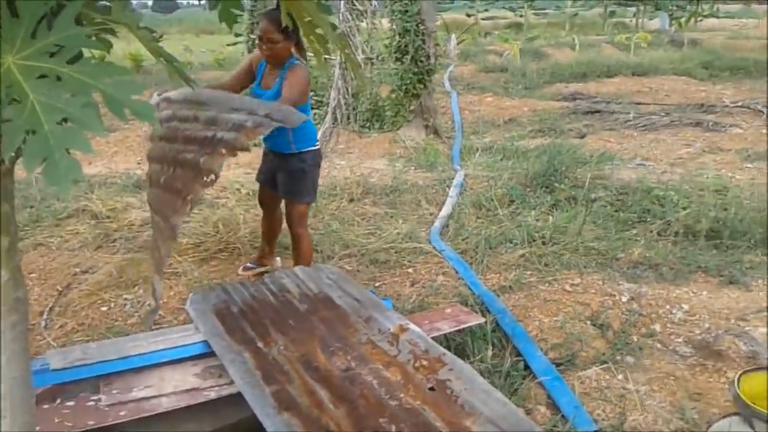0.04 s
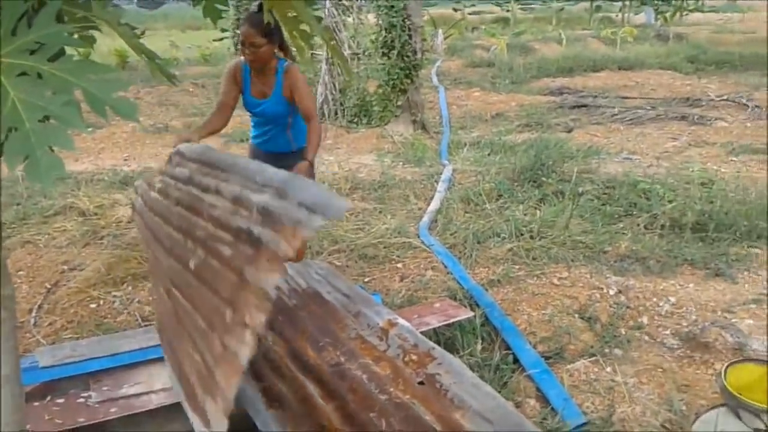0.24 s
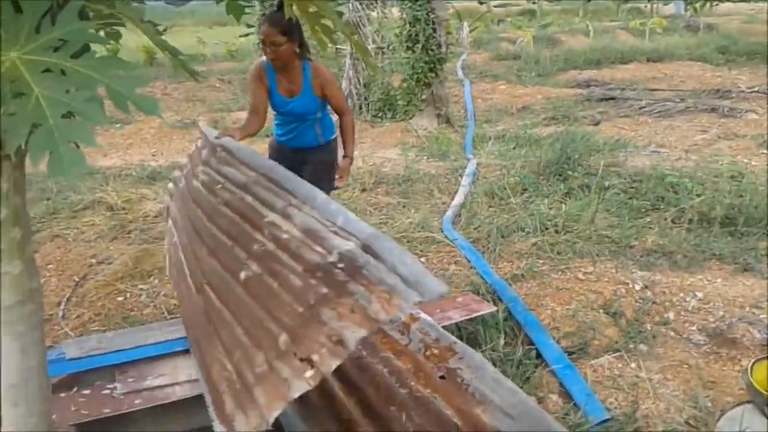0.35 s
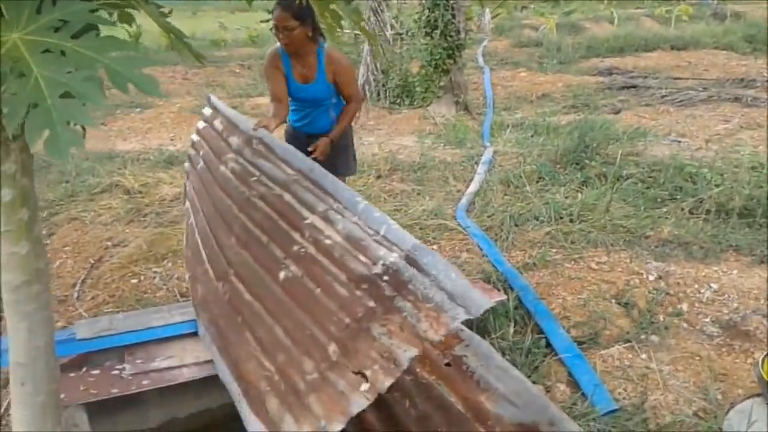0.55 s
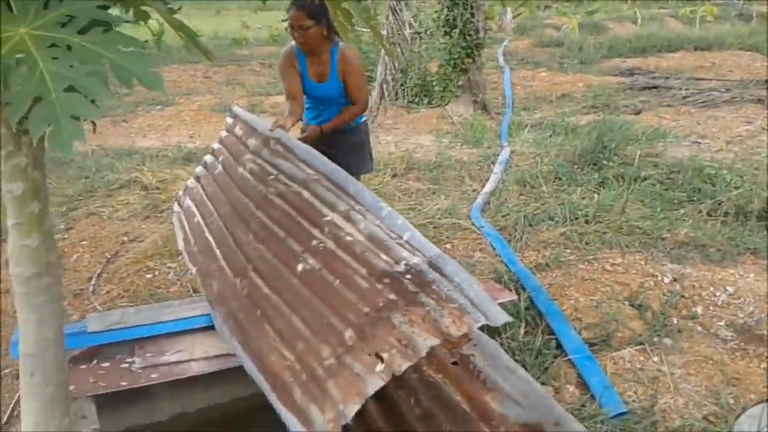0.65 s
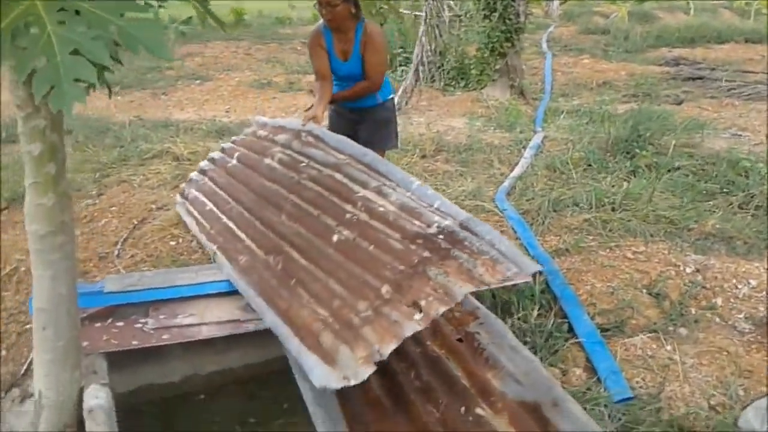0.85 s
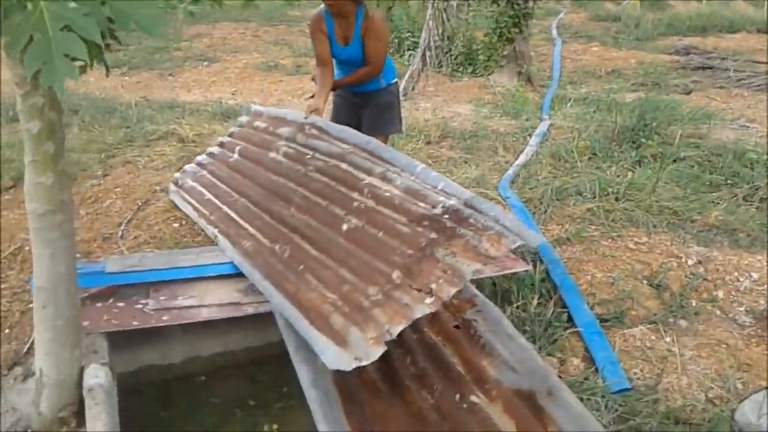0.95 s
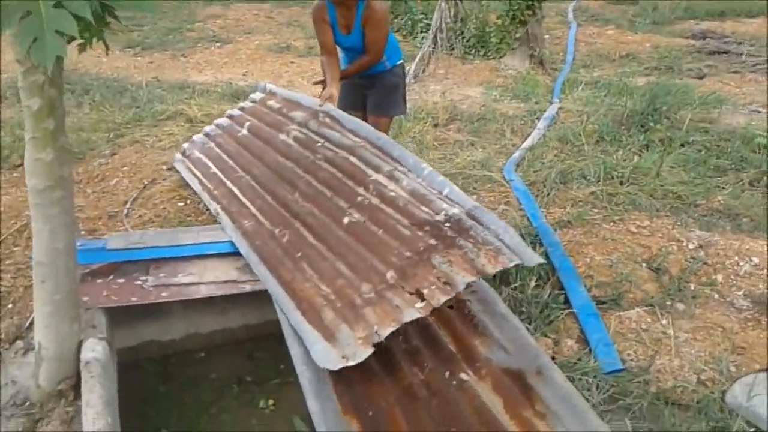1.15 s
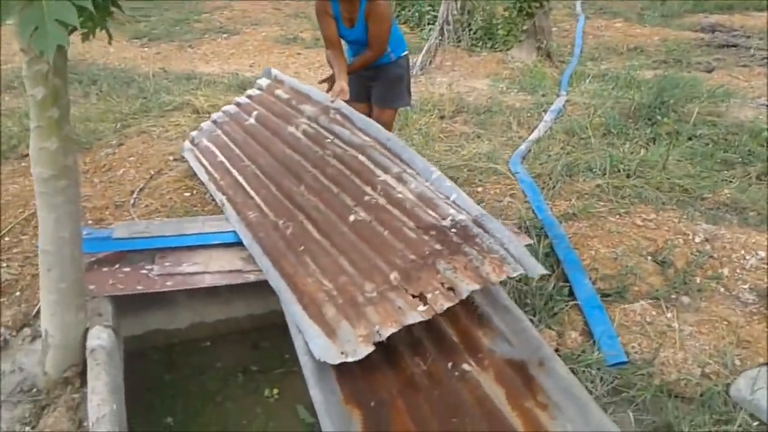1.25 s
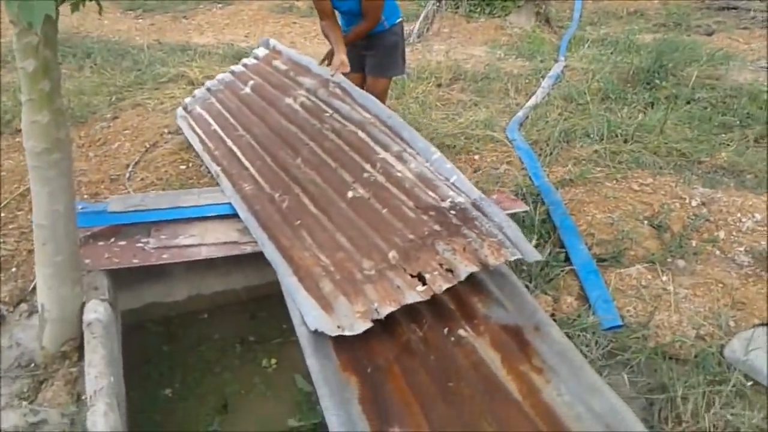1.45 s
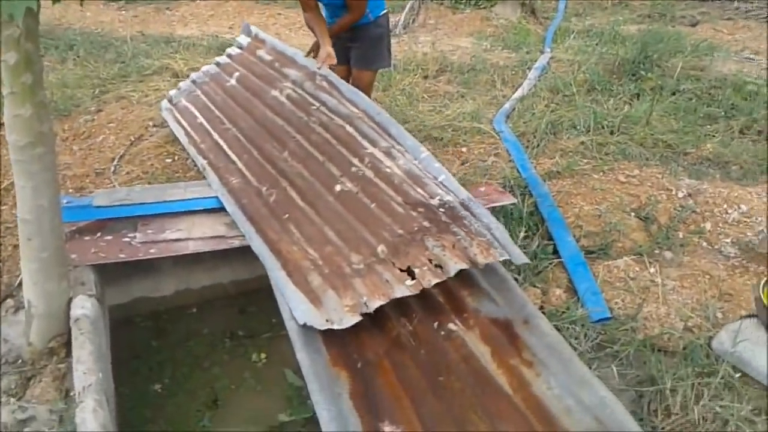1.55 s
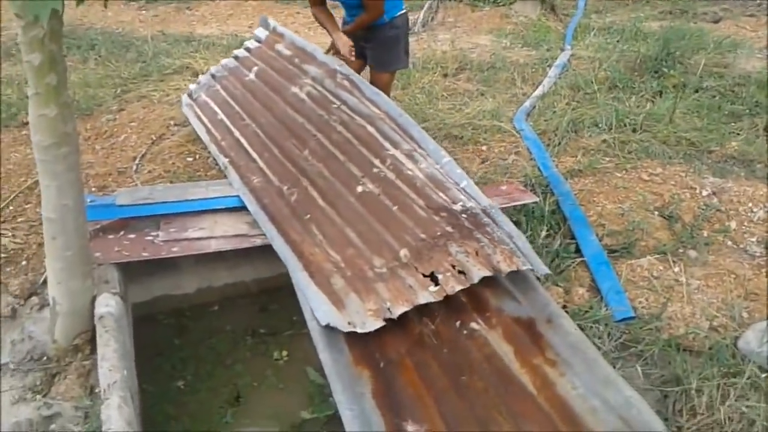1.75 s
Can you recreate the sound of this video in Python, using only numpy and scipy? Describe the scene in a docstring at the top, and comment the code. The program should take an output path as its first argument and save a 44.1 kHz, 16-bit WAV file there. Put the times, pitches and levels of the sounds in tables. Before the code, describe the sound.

A thin roofing sheet grinds across another with rattling knocks, brief squeals and one sharp bang

```python
"""A gritty metal scrape over quiet open air comes first, soon joined by many knocks and three short squeals.
A rusty corrugated roofing sheet is swung down onto another one and pushed along it, outdoors.
Its edge scrapes over the rust, catches and knocks on the ridges, slams flat once and rocks to rest.
Tiny random pushes ring a model of the sheet: dense ringing, longest at low pitches, and a few
steady-pitched tones. Squeals are gliding tones; the air is filtered noise."""
import sys
import numpy as np
from scipy import signal
from scipy.fft import rfft, irfft
from scipy.io import wavfile

SR = 44100
rng = np.random.default_rng(int(sys.argv[2]) if len(sys.argv) > 2 else 0)


def unload_audio(sound):
    """Save the sound as a 16-bit wav file, at the path given as the first command line argument."""
    columns = np.transpose(np.atleast_2d(sound))
    # keep every value between -1 and 1, then stretch to whole-number steps
    steps = np.round(np.clip(columns, -1, 1) * 32767)
    wavfile.write(sys.argv[1], SR, steps.astype(np.int16))


N = 79380  # length in samples (1.8 s)

# Sliding over time: start_s, grind_level_db, rust_hiss_level_db, low_flexing_level_db
SLIDE_LEVELS = [(0, -43, -50.5, -64), (.14, -41.5, -46.5, -61.5), (.22, -34.5, -33, -73),
                (0.299, -30, -38.5, -45.5), (.36, -30, -41, -47.5), (0.431, -24, -32.5, -41),
                (.5, -34.5, -43.5, -41.5), (.6, -31, -35.5, -49), (.68, -32.5, -40, -49.5),
                (.8, -26, -42, -38), (.87, -34, -39, -49.5), (.98, -31, -34, -43.5), (1.1, -31, -39, -44.5),
                (1.22, -28.5, -44, -49), (1.38, -33, -43, -43.5), (1.45, -43, -54, -51),
                (1.66, -40, -53, -52), (1.8, -53, -70.5, -54.5)]
# Knocks of sheet on sheet: start_s, body_level_db, clang_level_db, edge_level_db,
# favoured_pitch_hz, chatter_length_s, rise_s
KNOCKS = [(0.061, -37.5, -36, -67, 1370, 0.0071, 0.00053), (0.223, -51, -28.5, -36, 2110, 0.0093, 0.002),
          (0.244, -38.5, -32, -29, 1860, 0.016, 0.0024), (0.262, -42, -31.5, -28.5, 2020, 0.032, 0.0064),
          (0.296, -30, -26.5, -36, 2090, 0.031, 0.0059), (0.315, -28.5, -26, -28.5, 2020, 0.019, 0.0057),
          (0.336, -49, -26.5, -24.5, 2020, 0.017, 0.004), (0.4, -30.5, -31, -35, 1700, 0.035, 0.003),
          (0.442, -26.5, -32, -23.5, 1850, 0.015, 0.0016), (0.469, -25, -34.5, -30.5, 1540, 0.033, 0.0024),
          (0.486, -36, -21, -31.5, 1490, 0.018, 0.00059),
          (0.542, -29.5, -27.5, -27.5, 1050, 0.032, 0.00041),
          (0.568, -37.5, -26.5, -42, 1160, 0.021, 0.0012), (0.597, -30.5, -29.5, -26, 1600, 0.011, 0.0026),
          (0.657, -30, -49, -51.5, 1360, 0.012, 0.001), (0.692, -40.5, -47, -34.5, 1550, 0.0065, 0.0013),
          (0.724, -24.5, -28, -38, 1570, 0.032, 0.00036), (0.781, -38, -28, -27.5, 1640, 0.0059, 0.0015),
          (0.785, -28.5, -22, -47, 1640, 0.0043, 0.0007), (0.822, -26, -28.5, -37, 1370, 0.014, 0.0052),
          (0.882, -26, -35.5, -40.5, 810, 0.017, 0.00027), (0.911, -25, -31, -32.5, 1620, 0.013, 0.0035),
          (0.947, -30, -32.5, -33.5, 990, 0.011, 0.0027), (0.992, -30, -37, -36, 1200, 0.008, 0.0027),
          (1.03, -49, -53, -32.5, 2440, 0.0084, 0.00233), (1.054, -30.5, -29.5, -35, 1730, 0.025, 0.0033),
          (1.084, -39, -50, -34.5, 2790, 0.016, 0.005), (1.1095, -20, -16, -19, 2780, 0.0063, 0.00017),
          (1.126, -26.5, -25, -34.5, 1390, 0.025, 0.0044), (1.165, -25.5, -23, -34.5, 1040, 0.032, 0.0013),
          (1.232, -28.5, -31.5, -36.5, 930, 0.0078, 0.0043), (1.25, -34, -34.5, -36, 1090, 0.016, 0.0011),
          (1.291, -31.5, -53, -38, 1710, 0.012, 0.0036), (1.357, -38, -35.5, -39, 2060, 0.023, 0.0058),
          (1.48, -41, -39, -53, 2490, 0.014, 0.01), (1.578, -41, -42.5, -49, 1790, 0.011, 0.007),
          (1.628, -40.5, -34.5, -43, 1800, 0.015, 0.003)]
# Squeals where the edge sticks and slips evenly: start_s, length_s, first_pitch_hz, last_pitch_hz, level_db
SQUEALS = [(0.482, 0.066, 1585, 1470, -32), (0.541, 0.04, 993, 1144, -27.5),
           (0.884, 0.022, 826, 773, -29.5)]
# Strongest tones of the sheet, compared with each other: pitch_hz, level_db
STEADY_TONES = [(342, -5), (573, 19), (774, 12.5), (914, -1), (1202, -3.5), (1496, -16.5), (1556, 2.5),
                (1650, 9.5), (2097, -5.5), (2325, -13.5), (2595, -28.5), (2780, -21.5), (3180, -18),
                (3780, 17)]
# How long the dense ringing takes to fall by 60 dB: pitch_hz, decay_s
DENSE_DECAY = [(200, 0.48), (800, 0.25), (2000, 0.12), (4000, 0.14), (9000, 0.059)]
# Tone colour of the grinding, rust hiss, flexing, knocks and open air: pitch_hz, relative_level_db
GRIND_COLOUR = [(250, -27.5), (480, -16.5), (720, -4.5), (1000, -4), (1600, 0), (2150, 3.5), (2700, -2.5),
                (3300, -34.5), (5000, -22)]
HISS_COLOUR = [(2000, -25), (3000, 7.5), (3800, 2), (4800, 0), (5900, 0), (6800, -1), (7600, 3.5),
               (8900, -6.5)]
FLEX_COLOUR = [(25, -23), (70, -25.5), (110, -12.5), (165, -2), (250, -4), (340, 3), (450, -3),
               (800, -21.5)]
KNOCK_COLOUR = [(40, -47), (150, -29), (330, -19), (490, -14.5), (590, -6.5), (900, 2.5), (1150, -0.5),
                (1550, 5.5), (2700, 0), (3200, -5.5), (5000, -13.5), (8800, -19.5)]
AIR_COLOUR = [(25, -11), (80, -13.5), (160, 0), (300, 0.5), (1000, 1), (2500, 0.5), (3300, -4),
              (9000, -28.5)]
# Faint left-right difference made by filtering and delaying the middle: pitch_hz, level_db
SIDE_COLOUR = [(120, -15.5), (300, -28), (550, -22), (750, -47), (1600, -68), (2400, -62), (3400, -31),
               (5000, -19), (8500, -18)]
# Colour of the left-right difference in the air: pitch_hz, relative_level_db
WIDE_AIR_COLOUR = [(25, -2), (200, -16), (500, -12.5)]

# The ringing sheet
STEADY_TONE_DECAY_S, STEADY_TONE_DB = 0.14, -17  # time to fall 60 dB; level against the dense ringing
CRACK_DB, CRACK_S = -1, 0.0012  # extra dense ring in the first pass of the wave across the sheet
SPREAD_S = 0.0002  # bending waves arrive spread over about this time
# Sliding: average number of pushes per second
CATCHES_PER_S, GRAINS_PER_S = 500, 900
# Knocks
BODY_TOP_HZ, EDGE_BOTTOM_HZ = 1110, 4430  # the clang lies between body and edge
LEVEL_SPAN_S = 0.018  # the opening over which a knock's levels are set
CHATTER_PER_S, CHATTER_DB = 1100, -4  # chatter strength before the levels are set
BLOW_DB, HARD_RISE_S = 8, 0.0022  # first blow on the same scale; slower contacts lose it
SPOT_DB, SPOT_Q = 5.5, 3.8  # lift and sharpness of the pitch that the struck spot favours
# Squeals, air, left-right difference and top
SQUEAL_ROUGHNESS = 0.027  # typical pitch wobble, as a fraction
AIR_DB, WIDE_AIR_DB = -48, -76
SIDE_LAG_S = 0.006
TOP_HZ = 9020


def undb(db):
    """Turn decibels into a multiplier."""
    return 10 ** (np.asarray(db) / 20)


def unit(x):
    """Scale a sound to an average (rms) strength of 1."""
    return x / np.sqrt(np.mean(x ** 2) + 1e-18)


def lookup(hz, table):
    """Read between table points, with pitch spaced in octaves as the ear hears it."""
    pitch, value = np.array(table, float).T
    return np.interp(np.log(np.maximum(hz, 1)), np.log(pitch), value)


def colour(x, table):
    """Filter through pitch and level points, without any sound before its cause."""
    hz = np.maximum(np.fft.rfftfreq(4096, 1 / SR), 5)
    octaves_below = np.maximum(np.log2(table[0][0] / hz), 0)
    octaves_above = np.maximum(np.log2(hz / table[-1][0]), 0)
    level_db = lookup(hz, table) - 18 * (octaves_below + octaves_above)
    # Folding the cepstrum (transform of the log level) packs the response to the front.
    cepstrum = irfft(np.log(undb(level_db)))
    half = len(cepstrum) // 2
    cepstrum[1:half] *= 2
    cepstrum[half + 1:] = 0
    response = irfft(np.exp(rfft(cepstrum)))
    return signal.fftconvolve(x, response)[:len(x)]


def band(x, hz, kind):
    """Keep the low, middle or high part of a sound with a third-order filter."""
    return signal.sosfilt(signal.butter(3, hz, kind, fs=SR, output="sos"), x)


def add(out, start_s, x):
    """Mix a sound in at its start time."""
    i = int(start_s * SR)
    out[i:i + len(x)] += x[:N - i]


def clicks(per_s, scatter_db, size):
    """Tiny impacts at random moments, pushing either way with uneven strength."""
    chance = rng.random(size)
    strength = np.clip(rng.standard_normal(size), -2, 2)
    sign = rng.choice([-1, 1], size)
    return (chance < per_s / SR) * sign * undb(scatter_db * strength)


def sheet():
    """Ring of a struck sheet: a crack, dense ringing, longest at low pitches, and a few steady-pitched tones."""
    t = np.arange(16384) / SR
    hz = np.fft.rfftfreq(len(t), 1 / SR)
    # Random noise stands for the dense ringing at a random spot; each pitch region fades at its own rate.
    spot = rfft(rng.standard_normal(len(t)))
    dense = np.zeros(len(t))
    centres, decays_s = np.array(DENSE_DECAY).T
    for share, decay_s in zip(np.eye(len(centres)), decays_s):
        region = irfft(spot * lookup(hz, np.c_[centres, share]))
        dense += region * np.exp(-np.log(1000) * t / decay_s)
    dense *= 1 + undb(CRACK_DB) * np.exp(-t / CRACK_S)

    tones = np.zeros(len(t))
    for pitch_hz, level_db in STEADY_TONES:
        detuned_hz = pitch_hz * (1 + 0.0021 * rng.standard_normal())
        tones += undb(level_db) * np.sin(2 * np.pi * (detuned_hz * t + rng.random()))
    tones *= np.exp(-np.log(1000) * t / STEADY_TONE_DECAY_S)

    onset = 1 - np.exp(-t / SPREAD_S)
    return (unit(dense) + undb(STEADY_TONE_DB) * unit(tones)) * onset


def rub(per_s, scatter_db, table, count=12):
    """Stick-slip catches ring the sheet from a spot that travels along its edge."""
    force = clicks(per_s, scatter_db, size=N)
    place = np.linspace(0, count - 1, N)
    x = np.zeros(N)
    for k in range(count):
        nearness = np.sqrt(np.maximum(1 - abs(place - k), 0))  # fade from spot to spot
        x += signal.fftconvolve(force * nearness, sheet())[:N]
    return unit(colour(x, table))


def slide():
    """The edge grinds over the ridges, rust grains hiss and the whole sheet flexes."""
    start_s, *levels_db = np.array(SLIDE_LEVELS).T
    t = np.arange(N) / SR
    grind, hiss, flex = (undb(np.interp(t, start_s, db)) for db in levels_db)
    return (grind * rub(CATCHES_PER_S, 5.2, GRIND_COLOUR)
            + hiss * rub(GRAINS_PER_S, 6, HISS_COLOUR)
            + flex * rub(CATCHES_PER_S, 4.9, FLEX_COLOUR))


def open_air():
    """Steady filtered noise: the middle and the left-right difference of quiet open air."""
    middle = undb(AIR_DB) * unit(colour(rng.standard_normal(N), AIR_COLOUR))
    side = undb(WIDE_AIR_DB) * unit(colour(rng.standard_normal(N), WIDE_AIR_COLOUR))
    return middle, side


def knocks():
    """Each contact is a blow and a swelling, fading chatter of the loose sheets against each other."""
    out = np.zeros(N)
    for start_s, body_db, clang_db, edge_db, spot_hz, chatter_s, rise_s in KNOCKS:
        ring = sheet()
        t = np.arange(len(ring)) / SR
        pressure = (1 - np.exp(-t / rise_s)) * np.exp(-(t / chatter_s) ** 2)
        force = clicks(CHATTER_PER_S, 3.3, size=len(t)) * pressure * undb(CHATTER_DB)
        force[0] = undb(BLOW_DB) * np.exp(-(rise_s / HARD_RISE_S) ** 2)
        x = colour(signal.fftconvolve(force, ring)[:len(t)], KNOCK_COLOUR)
        favoured = signal.lfilter(*signal.iirpeak(spot_hz, SPOT_Q, fs=SR), x)
        x = x + (undb(SPOT_DB) - 1) * favoured

        body = band(x, BODY_TOP_HZ, "low")
        clang = -band(x, [BODY_TOP_HZ, EDGE_BOTTOM_HZ], "band")  # turned upside down
        edge = band(x, EDGE_BOTTOM_HZ, "high")
        # The opening counts most when each part is set to its level.
        weight = np.exp(-(t / LEVEL_SPAN_S) ** 2)
        for part, level_db in ((body, body_db), (clang, clang_db), (edge, edge_db)):
            strength = np.sqrt(np.average(part ** 2, weights=weight))
            add(out, start_s, part * undb(level_db) / strength)
    return out


def squeals():
    """Metal rubbing on metal sticks and slips evenly, giving brief, rough gliding tones."""
    out = np.zeros(N)
    for start_s, length_s, first_hz, last_hz, level_db in SQUEALS:
        n = int(length_s * SR)
        waver = unit(band(rng.standard_normal(N), 450, "low"))[:n]
        hz = np.linspace(first_hz, last_hz, n) * (1 + SQUEAL_ROUGHNESS * waver)
        tone = np.sin(2 * np.pi * np.cumsum(hz) / SR)
        faded = tone * signal.windows.tukey(n, .5)  # soft start and end
        add(out, start_s, undb(level_db) * unit(faded))
    return out


def scene():
    """The sheets over quiet open air: a nearly central sound with a faint left-right difference."""
    metal = slide() + knocks() + squeals()
    air, wide_air = open_air()
    lag = np.zeros(int(SIDE_LAG_S * SR))
    side_layer = np.r_[lag, colour(metal, SIDE_COLOUR)][:N]
    side = wide_air + side_layer
    return metal + air + side * np.array([[1], [-1]])  # added left, subtracted right


def record(dry):
    """The recorder cuts the top steeply."""
    return signal.sosfilt(signal.ellip(12, .2, 75, TOP_HZ, fs=SR, output="sos"), dry)


dry = scene()
out = record(dry)
unload_audio(out)
```